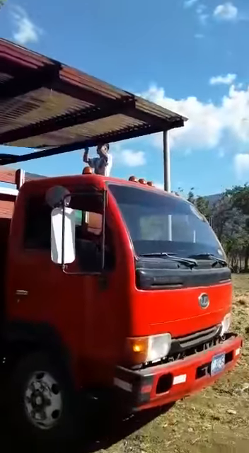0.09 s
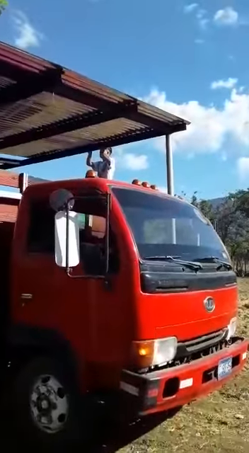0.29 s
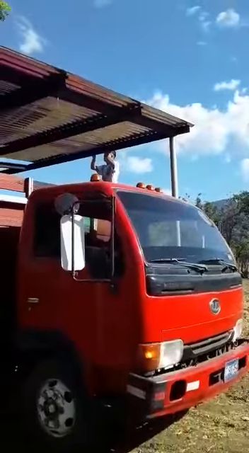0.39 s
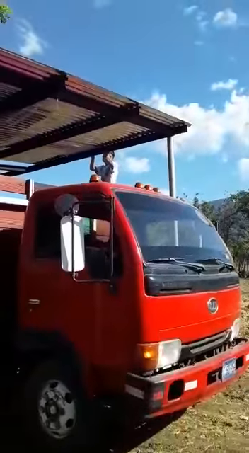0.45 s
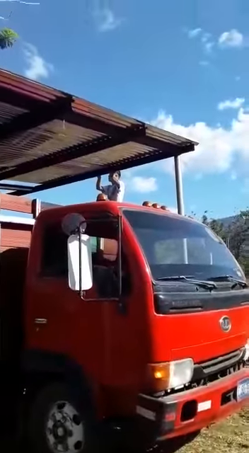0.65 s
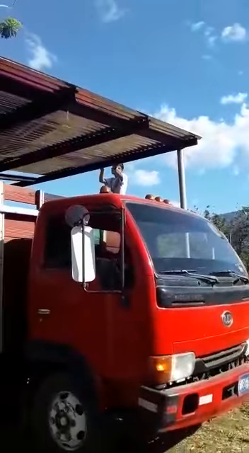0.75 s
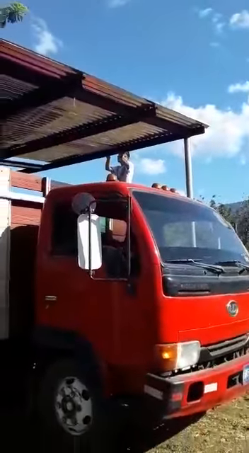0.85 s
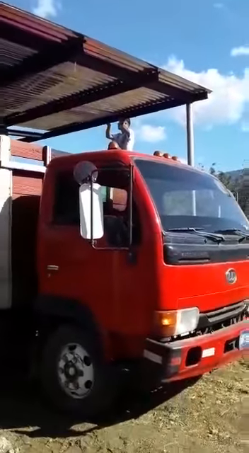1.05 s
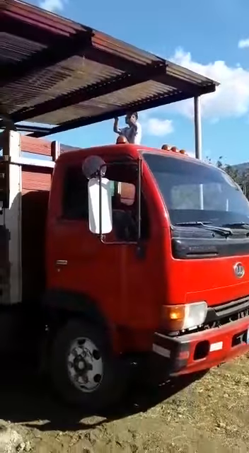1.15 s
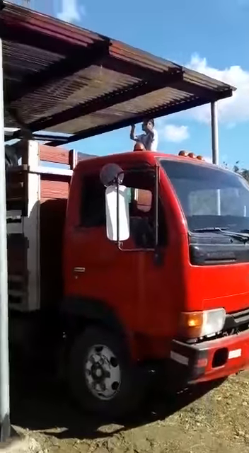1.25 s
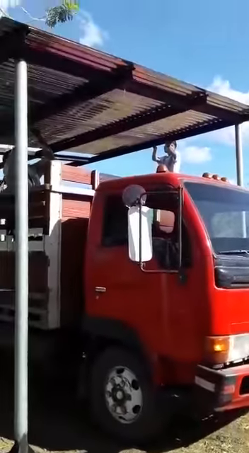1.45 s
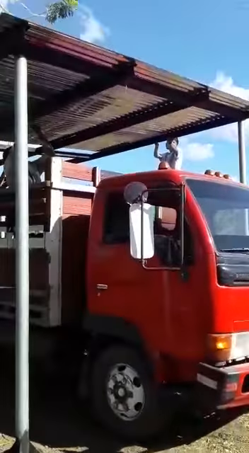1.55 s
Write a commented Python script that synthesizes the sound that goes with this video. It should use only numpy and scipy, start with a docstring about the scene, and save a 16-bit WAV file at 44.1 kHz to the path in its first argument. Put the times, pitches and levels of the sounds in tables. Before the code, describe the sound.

A loud crash of sheet metal roofing caught by a truck, settling with soft clinks.

```python
"""A truck creeps under a corrugated metal roof outdoors and catches it.
First the sheets creak over faint outdoor air. Then they give way in a quick run of blows that pile up
into one loud crash: each blow sets a dense cloud of sheet modes ringing, loose laps chatter, edges skid
and the whole roof thumps. Fittings clink as it settles, and at the end it shudders again, softly."""
import sys
import numpy as np
from scipy import signal
from scipy.fft import rfft, irfft
from scipy.io import wavfile
from scipy.ndimage import uniform_filter1d, minimum_filter1d, map_coordinates

SR = 44100
rng = np.random.default_rng(int(sys.argv[2]) if len(sys.argv) > 2 else 0)


def wrap_up_sound(samples):
    """Save the sound to the file named by the first command line argument, as 16-bit audio."""
    columns = np.atleast_2d(samples).T
    # keep every value between -1 and 1, then stretch to whole-number steps
    tamed = np.clip(columns, -1, 1)
    steps = np.round(tamed * 32767).astype(np.int16)
    wavfile.write(sys.argv[1], SR, steps)


N = 70560
TIME, BINS_HZ = np.arange(N) / SR, np.arange(N // 2 + 1) * SR / N

# colour of the outdoor air: frequency_hz, relative_db
AIR_COLOUR = [(25, -3), (70, -2), (200, -0.5), (600, -6.5), (1100, -8.5), (1550, -14), (3000, -7.5),
              (6500, -14.5), (8200, -15), (9600, -30), (16000, -35)]
# small loose fittings clink: start_s, level_db, t60_s, tilt_db_per_octave
CLINKS = [(0.736, -38, 0.2, -5), (.812, -43, 0.057, 4), (0.827, -44, .25, -7.5), (.856, -42, 0.083, -2),
          (0.92, -49.5, 0.21, -2), (1.166, -48.5, 0.6, -10), (1.427, -48.5, 0.42, -8),
          (1.515, -48.5, 0.17, -12)]
# resonances of the fittings: pitch_hz, relative_db
CLINK_MODES = [(4296, -8), (6550, 0.5), (7600, 7), (8250, 6), (8550, 6.5), (12150, 3.5), (12650, -11),
               (14000, 0), (14900, -4), (15650, 3)]
# an edge skids on the truck: centre_s, half_length_s, pitch_hz, rise_hz_per_s, bandwidth_hz, level_db
SKIDS = [(0.268, 0.0061, 4444, 70000.5, 1490, -14), (0.469, 0.0077, 4480, 4.5, 1211, -23.5),
         (0.138, 0.019, 3000, 3, 1200, -47.5), (.942, 0.0071, 4320, 1, 400, -49),
         (1.105, .012, 3280, -12000, 297.5, -54), (1.217, 0.031, 3270, 1, 797, -49),
         (1.24, .03, 1077, 1.5, 189.4, -49.5), (1.323, 0.011, 3300, 0, 895, -45.5)]
# the whole roof flexes: start_s, level_db, t60_s
THUMPS = [(0.246, -15.5, 0.34), (0.613, -31.5, .25), (1.285, -39.5, 0.66), (1.447, -44, 0.29)]
# colour of a thump: frequency_hz, relative_db
THUMP_COLOUR = [(30, -17), (70, -13.5), (160, -0.5), (260, 2), (350, -6), (560, 5.5), (720, -17),
                (1000, -15), (3000, -70)]
# blows on the roof: start_s, swell_s, boom_db, clash_db, sizzle_db
BLOWS = [(0.0, 0.0083, -44, -42, -57), (.110, 0.0043, -50, -45.5, -66), (0.218, 0.0028, -44, -49, -70),
         (.237, 0.0025, -24, -23.5, -42), (0.244, .007, -21, -17, -35), (.259, 0.007, -18, -15.5, -40),
         (.276, 0.0047, -27, -16, -48), (.291, 0.0055, -13, -11, -28), (.329, .006, -24.5, -12, -30),
         (.362, 0.0089, -16, -11.5, -32), (0.437, 0.0063, -20.5, -23, -39.5),
         (.463, .006, -24.5, -20.5, -35), (.508, .008, -23.5, -23, -44), (.562, 0.0093, -27.5, -32, -50),
         (.603, 0.0039, -40, -30.5, -50), (.737, 0.007, -44, -40, -52.5), (.812, .012, -41, -36.5, -55),
         (.853, .006, -46.5, -45, -52.5), (.920, 0.0044, -59, -44, -62), (0.975, 0.0039, -50, -50.5, -61),
         (1.100, 0.016, -56, -45.5, -57.5), (1.167, 0.0091, -53, -44, -54.5),
         (1.243, .024, -43, -35.5, -49.5), (1.273, 0.011, -40.5, -39.5, -56),
         (1.320, 0.0074, -49, -43, -54), (1.352, 0.015, -39.5, -42.5, -67),
         (1.428, 0.0043, -48, -44.5, -58), (1.445, 0.0036, -46.5, -43.5, -56),
         (1.515, .005, -71, -45.5, -64)]
# the boom, clash and sizzle registers of the sheets: low_hz, high_hz
REGISTERS = [(30, 1500), (1500, 9200), (9200, 17000)]
# how each register dies away: ring_t60_s, tail_t60_s, tail_db, crack_db, chatter_db
REGISTER_DECAYS = [(0.52, 1.304, -14, 6, -12.5), (0.44, 1.23, -16.5, 1, -8), (0.41, 1.2, -19, 1, -5)]
# the roof's strong modes: pitch_hz, relative_db, t60_s
STRONG_MODES = [(248.9, -15.5, 0.49), (286, -19, 0.49), (513, -16.5, 1), (571, -18.5, 1),
                (674, -16.5, 0.81), (725, -10, 0.62), (1146, -18.5, 0.93), (1645, -25, .5),
                (2230, -24.5, 0.79), (2760, -39, .55), (3020, -38, 0.29), (3594, -13, .6),
                (3870, -17, 0.64)]
# colour of the sheets: frequency_hz, relative_db
SHEET_COLOUR = [(35, -56), (70, -23), (125, -16.5), (165, -7.5), (205, -9), (245, -1.5), (345, -8),
                (420, -3), (510, -0.5), (720, 0), (920, -9.5), (1170, -5), (1450, -12.5), (1790, -13.5),
                (2020, -5), (2380, -9), (2750, -5), (3800, -8.5), (5000, -12.5), (6800, -18), (8200, -17),
                (9600, -29.5), (12500, -29), (16000, -33.5)]

CLINK_WIDTH_HZ, CLINK_ATTACK_S = 290, 0.0024
CHATTER_PER_S, CHATTER_SPREAD_DB, CHATTER_T60_S = 420, 4.5, 0.0079
MODE_SPACING_HZ, MODE_SPREAD_DB = 21.88, 2.5  # the dense cloud of lesser modes
FLUTTER_HZ, FLUTTER_DB = 70.05, 0.51
PEAK_LIMIT, LIMITER_S, LOW_CUT_HZ, HIGH_CUT_HZ = 1.0, .002, 105, 15850


def from_db(db):
    """Decibels to gain."""
    return 10 ** (np.asarray(db) / 20)


def rms_one(x):
    """Scale to unit level."""
    return x / np.sqrt(np.mean(x ** 2) + 1e-20)


def fade(age, t60):
    """Exponential decay that loses 60 dB in t60."""
    return np.exp(-np.log(1000) * np.maximum(age, 0) / t60)


def hit_envelope(start_s, attack_s, t60):
    """A straight attack into an exponential decay."""
    age = TIME - start_s
    return np.clip(age / attack_s, 0, 1) * fade(age, t60)


def wander(axis, step):
    """Random values a step apart, smoothly joined, at unit level."""
    return rms_one(map_coordinates(rng.standard_normal(8192), [axis / step], order=3, mode="wrap"))


def colour(points):
    """An EQ curve from a colour table."""
    hz, db = np.transpose(points)
    return from_db(np.interp(np.log(BINS_HZ + 1), np.log(hz), db))


def shaped(x, eq):
    """A steady signal through an EQ curve, at unit level."""
    return rms_one(irfft(rfft(x) * eq, N))


def outdoor_air(level_db=-47.5):
    """A faint, steady bed of outdoor noise."""
    return from_db(level_db) * shaped(rng.standard_normal(N), colour(AIR_COLOUR))


def clinks():
    """Loose fittings buzz briefly in a few high, narrow resonances."""
    body = sum((-1) ** k * from_db(db) / (1 + 2j * (BINS_HZ - hz) / CLINK_WIDTH_HZ)
               for k, (hz, db) in enumerate(CLINK_MODES))
    octaves = np.log2(np.maximum(BINS_HZ, CLINK_MODES[0][0]))  # flat below the lowest resonance
    out = 0
    for start_s, db, t60, tilt_db in CLINKS:
        buzz = shaped(rng.standard_normal(N), body * from_db(tilt_db * octaves))
        out += from_db(db) * hit_envelope(start_s, CLINK_ATTACK_S, t60) * buzz
    return out


def skids():
    """Edges stick and slip: a rough rising squeal in the crash, faint scrapes and a groan around it."""
    out = 0
    for centre_s, half_length_s, hz, rise, band_hz, db in SKIDS:
        offset_s = TIME - centre_s
        phase = 2 * np.pi * np.cumsum(hz + rise * offset_s) / SR
        roughness = wander(TIME, 1 / band_hz) + 1j * wander(TIME, 1 / band_hz)
        swell = np.exp(-.5 * (offset_s / half_length_s) ** 2)
        out += from_db(db) * swell * np.real(roughness * np.exp(1j * phase))
    return out


def thumps(attack_s=0.0049):
    """The whole roof flexes with a dull, quickly damped thump."""
    envelope = sum(from_db(db) * hit_envelope(start_s, attack_s, t60) for start_s, db, t60 in THUMPS)
    return envelope * shaped(rng.standard_normal(N), colour(THUMP_COLOUR))


def ringing():
    """Each blow strikes the strong modes with the force that it has in their register."""
    start_s, swell_s, boom_db, clash_db, _ = np.transpose(BLOWS)
    out = 0
    for hz, mode_db, t60 in STRONG_MODES:
        force_db = boom_db if hz < REGISTERS[0][1] else clash_db
        strike_s = start_s + swell_s * rng.random(len(BLOWS))
        polarity = rng.choice([-1, 1], len(BLOWS))
        strikes = np.zeros(N)
        strikes[(strike_s * SR).astype(int)] = from_db(force_db + mode_db) * polarity
        angle, radius = 2 * np.pi * hz / SR, fade(1 / SR, t60)
        resonator = [1, -2 * radius * np.cos(angle), radius ** 2]
        out += signal.lfilter([.5, 0, -.5], resonator, strikes + 1e-18)
    return out


def chatter():
    """Loose laps tap each other at random, each tap a very short burst."""
    taps = (rng.random(N) < CHATTER_PER_S / SR) * rng.choice([-1, 1], N)
    accents = from_db(CHATTER_SPREAD_DB * np.minimum(rng.exponential(1, N), 3))
    burst = rng.standard_normal(N) * fade(TIME, CHATTER_T60_S)
    return rms_one(signal.fftconvolve(taps * accents, burst)[:N])


def vibration(blows, register, crack_t60_s=0.066):
    """Envelope of one register: every blow adds a crack, a ring and a long faint tail."""
    ring_t60, tail_t60, tail_db, crack_db, _ = REGISTER_DECAYS[register]
    energy = 0
    for start_s, swell_s, *levels_db in blows:
        crack = from_db(crack_db) * hit_envelope(start_s, swell_s, crack_t60_s)
        ring = hit_envelope(start_s, swell_s, ring_t60)
        tail = from_db(tail_db) * hit_envelope(start_s, swell_s, tail_t60)
        energy += from_db(levels_db[register]) ** 2 * (crack ** 2 + ring ** 2 + tail ** 2)
    return np.sqrt(energy)


def sheet(blows):
    """One struck sheet: a wash of countless close modes of its own, gritty with chattering laps."""
    ripple_db = MODE_SPREAD_DB * np.minimum(BINS_HZ / 1500, 1)  # smoother below 1500 Hz
    cloud = colour(SHEET_COLOUR) * from_db(ripple_db * wander(BINS_HZ, MODE_SPACING_HZ))
    hiss, taps = rng.standard_normal(N), chatter()
    out = 0
    for register, (low_hz, high_hz) in enumerate(REGISTERS):
        eq = cloud * (BINS_HZ >= low_hz) * (BINS_HZ < high_hz)
        chatter_db = REGISTER_DECAYS[register][-1]
        texture = shaped(hiss + from_db(chatter_db) * taps, eq)
        out += texture * vibration(blows, register)
    return out


def sheets(count=3):
    """The blows fall on neighbouring sheets in turn; the sound flutters as they flex."""
    roof = sum(sheet(BLOWS[k::count]) for k in range(count))
    return roof * from_db(FLUTTER_DB * wander(TIME, 1 / FLUTTER_HZ))


def scene():
    """The crashing roof over the outdoor bed, in mono."""
    return (outdoor_air() + sheets() + ringing() + thumps() + skids() + clinks())[None]


def record(dry):
    """A fast limiter holds the loudest peaks; the deep bass and the very top are cut."""
    span = int(LIMITER_S * SR)
    needed_gain = PEAK_LIMIT / np.maximum(np.abs(dry), PEAK_LIMIT)
    smooth_gain = uniform_filter1d(minimum_filter1d(needed_gain, span), span)
    low_cut = signal.butter(2, LOW_CUT_HZ, "high", fs=SR, output="sos")
    high_cut = signal.ellip(12, .1, 80, HIGH_CUT_HZ, fs=SR, output="sos")
    return signal.sosfilt(high_cut, signal.sosfilt(low_cut, dry * smooth_gain))


dry = scene()
out = record(dry)
wrap_up_sound(out)
```